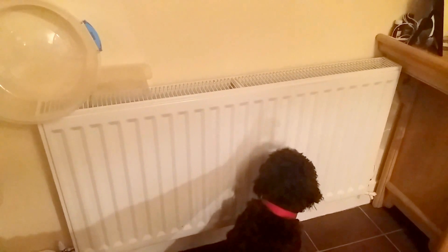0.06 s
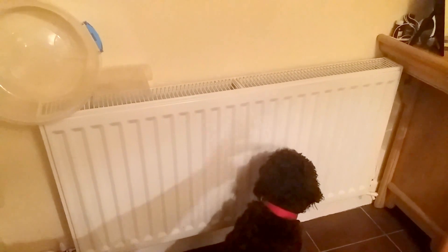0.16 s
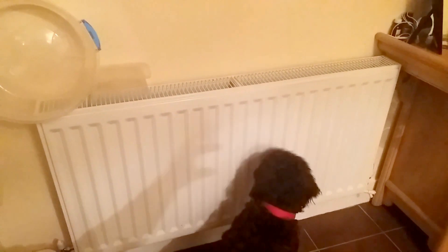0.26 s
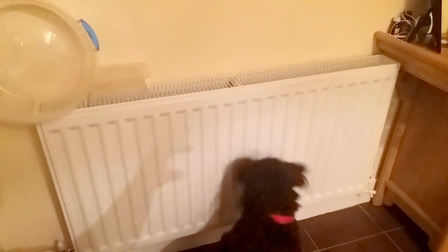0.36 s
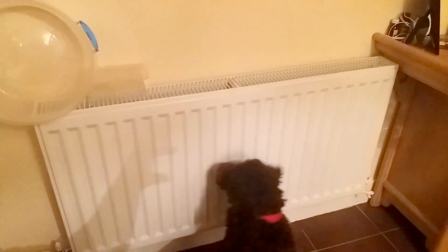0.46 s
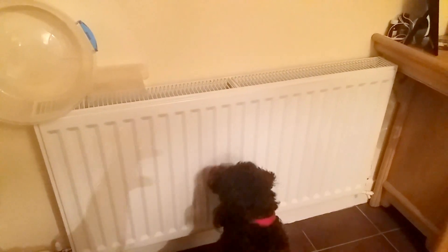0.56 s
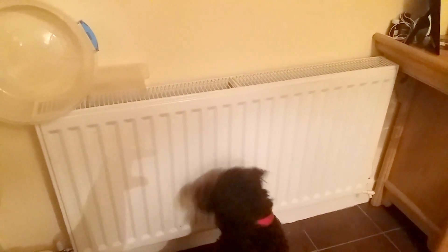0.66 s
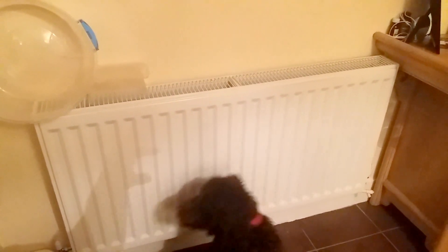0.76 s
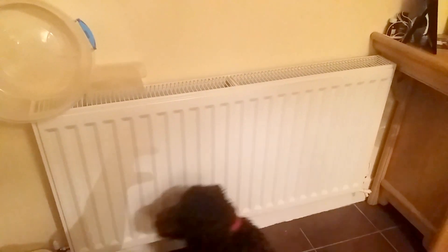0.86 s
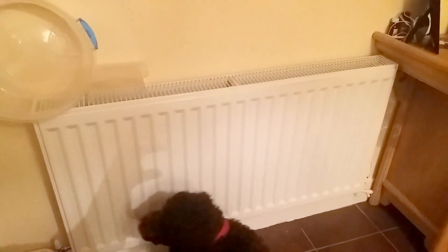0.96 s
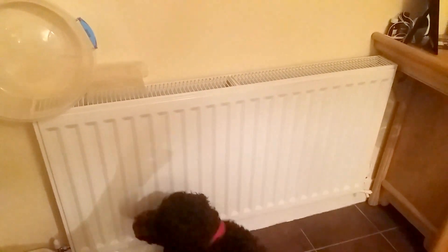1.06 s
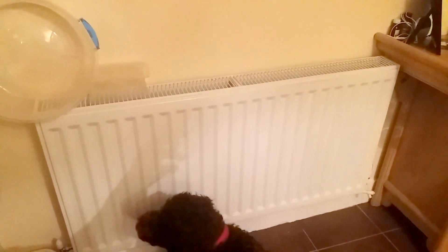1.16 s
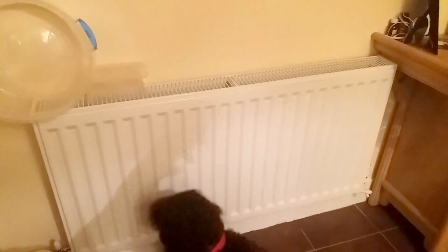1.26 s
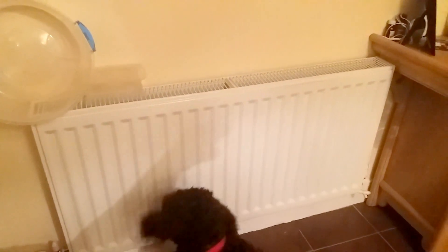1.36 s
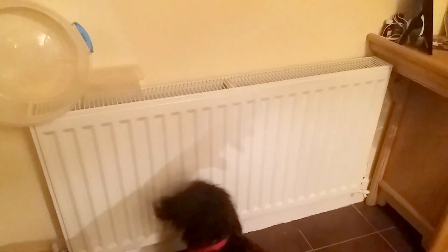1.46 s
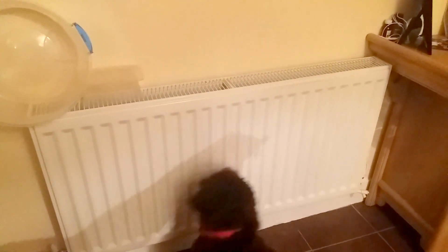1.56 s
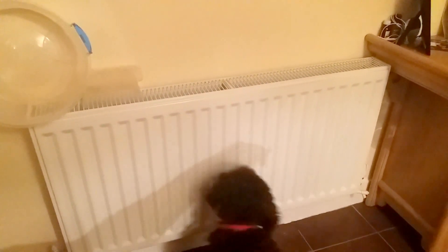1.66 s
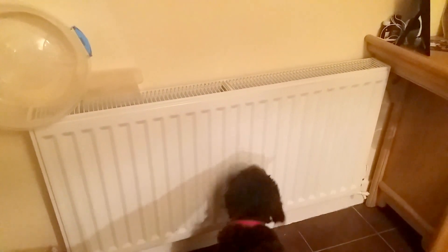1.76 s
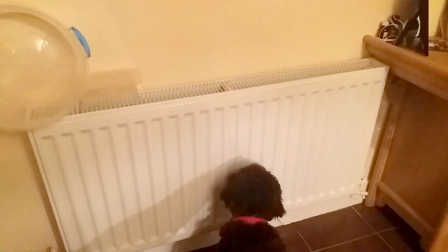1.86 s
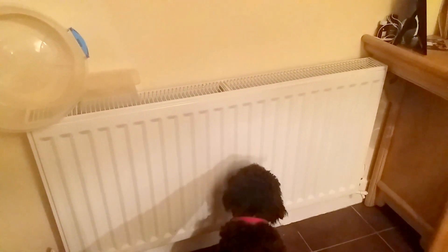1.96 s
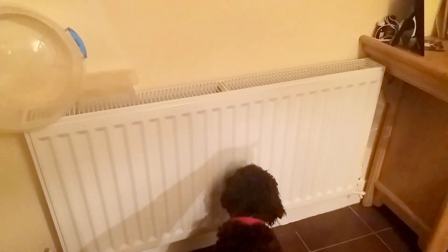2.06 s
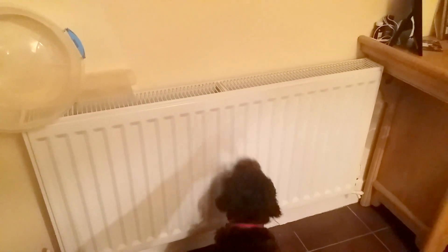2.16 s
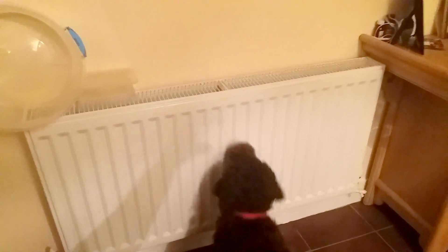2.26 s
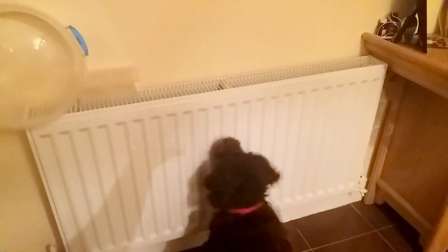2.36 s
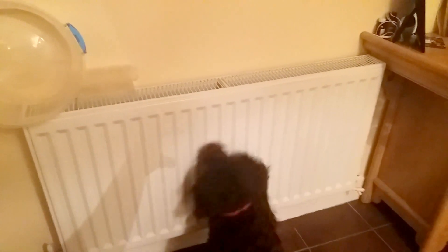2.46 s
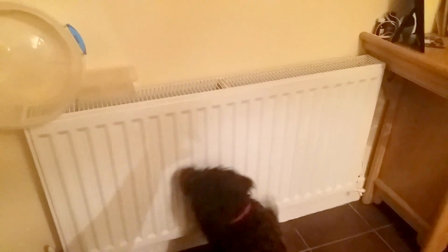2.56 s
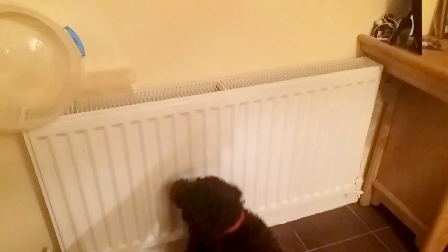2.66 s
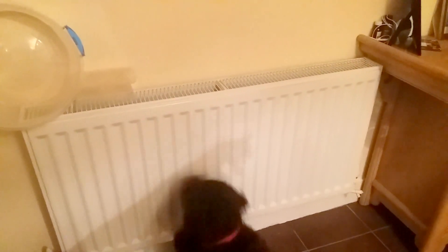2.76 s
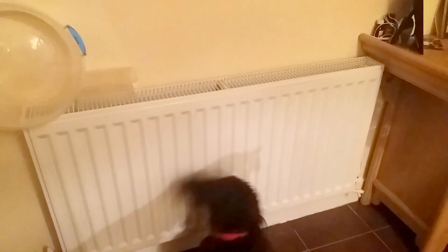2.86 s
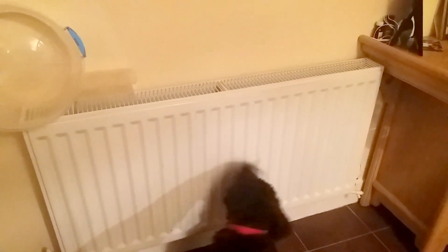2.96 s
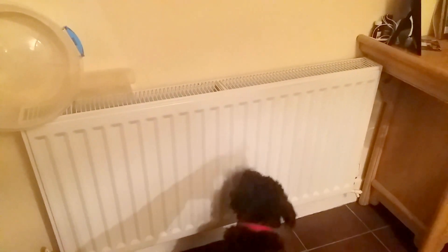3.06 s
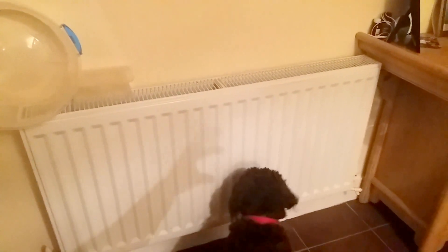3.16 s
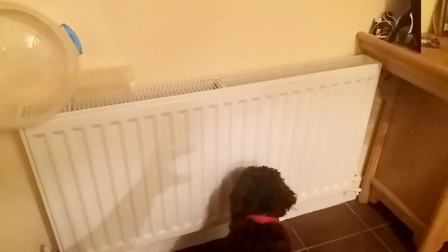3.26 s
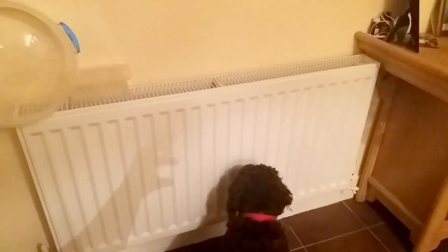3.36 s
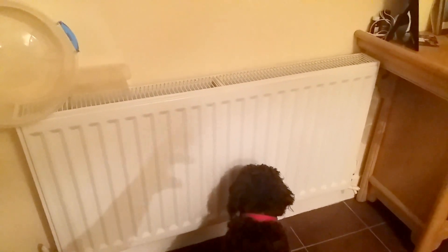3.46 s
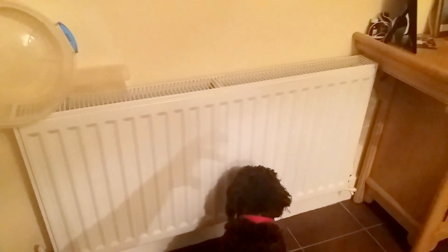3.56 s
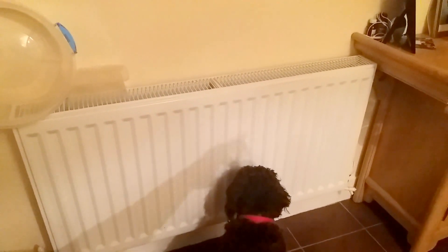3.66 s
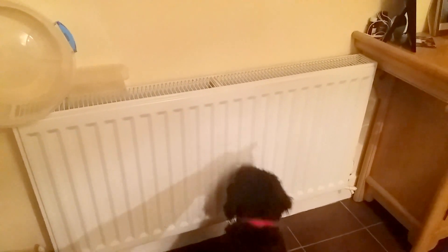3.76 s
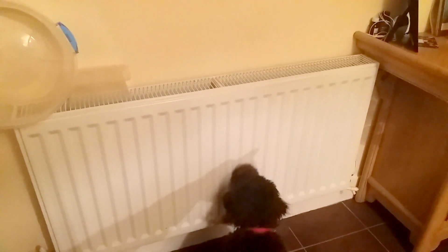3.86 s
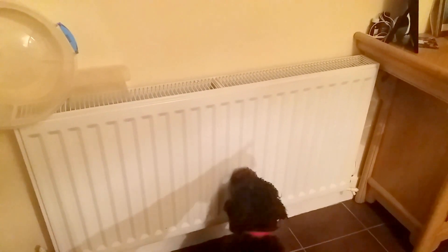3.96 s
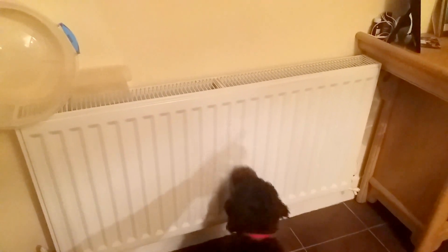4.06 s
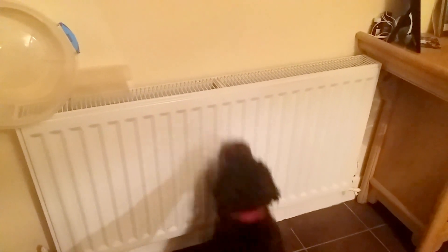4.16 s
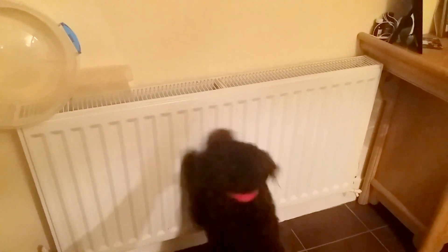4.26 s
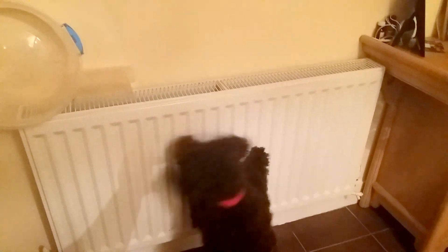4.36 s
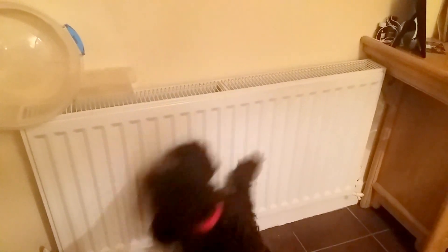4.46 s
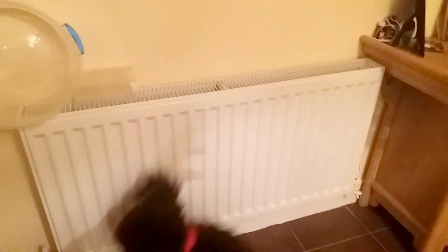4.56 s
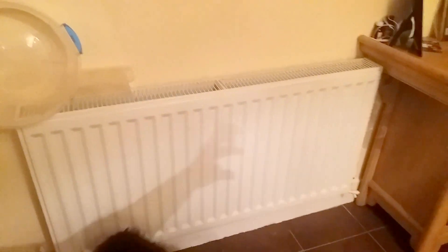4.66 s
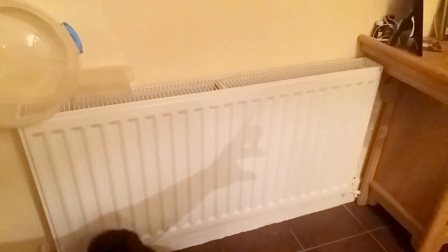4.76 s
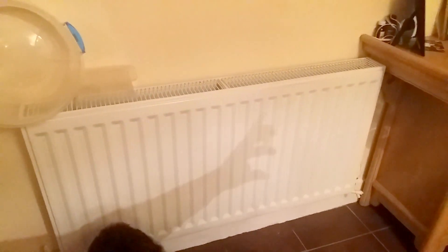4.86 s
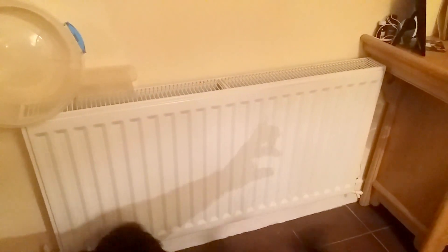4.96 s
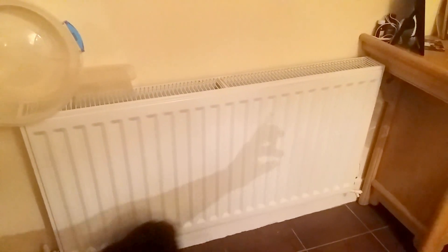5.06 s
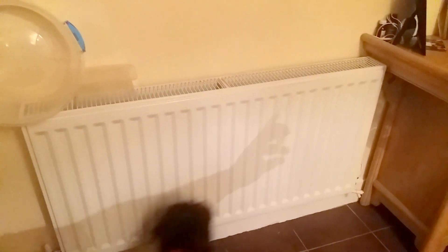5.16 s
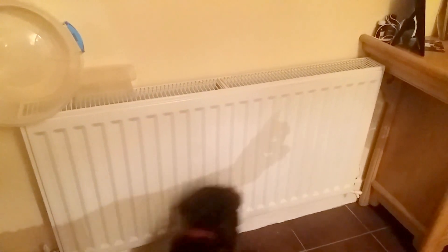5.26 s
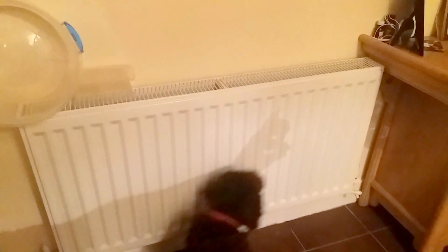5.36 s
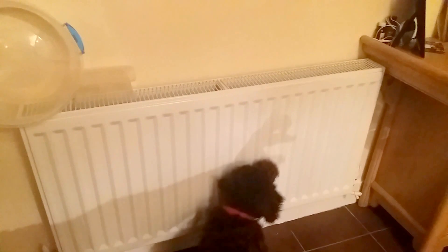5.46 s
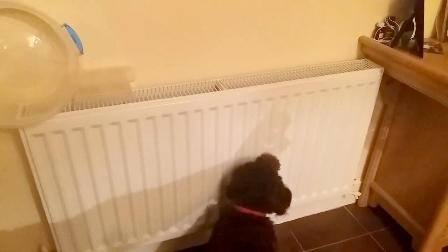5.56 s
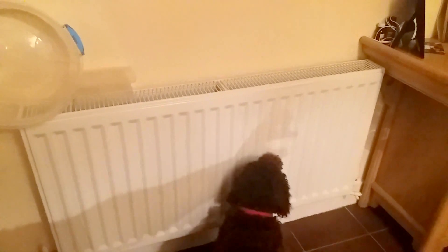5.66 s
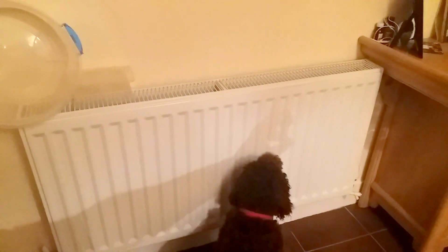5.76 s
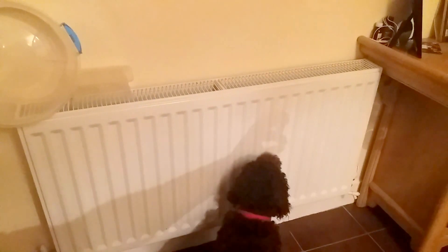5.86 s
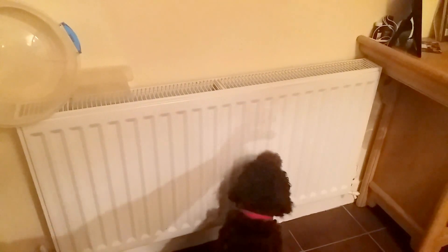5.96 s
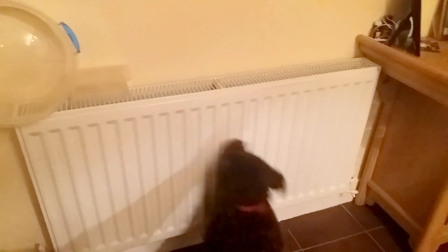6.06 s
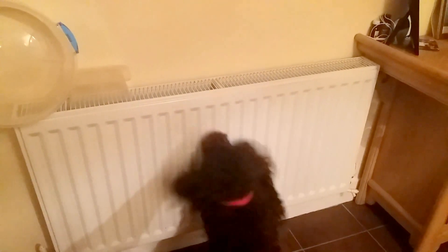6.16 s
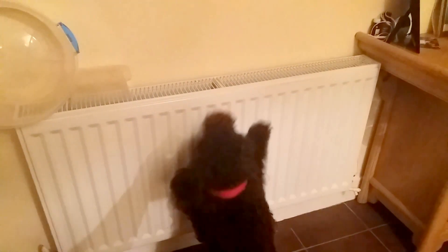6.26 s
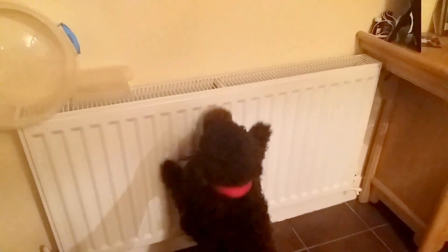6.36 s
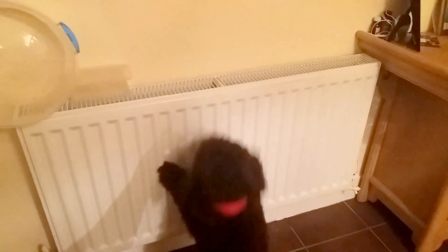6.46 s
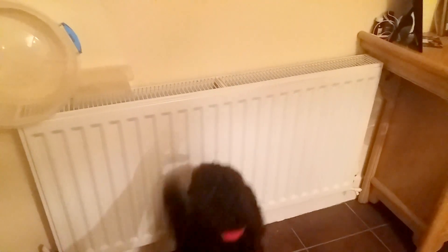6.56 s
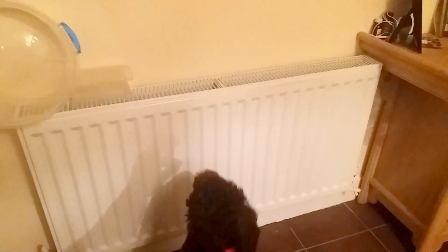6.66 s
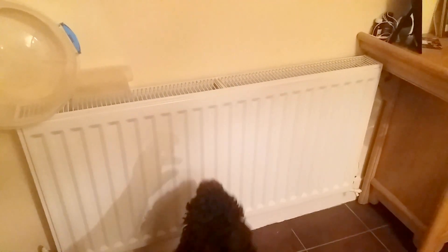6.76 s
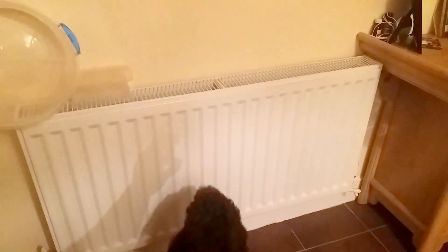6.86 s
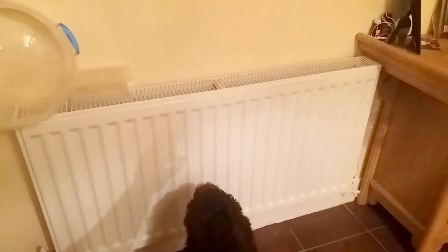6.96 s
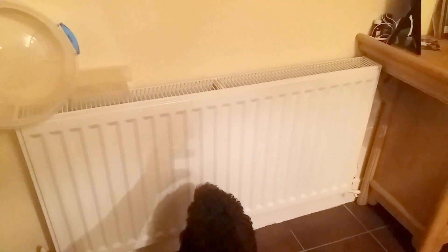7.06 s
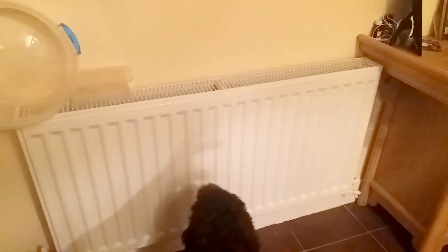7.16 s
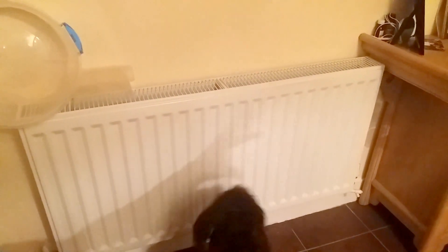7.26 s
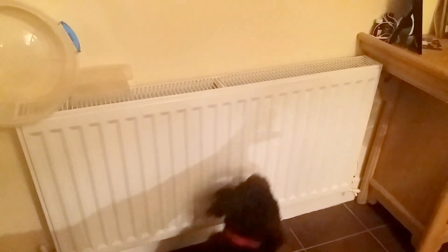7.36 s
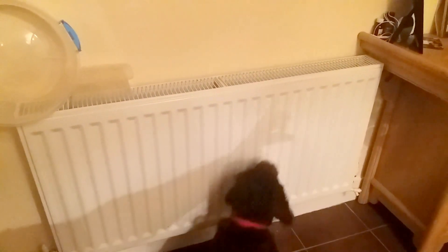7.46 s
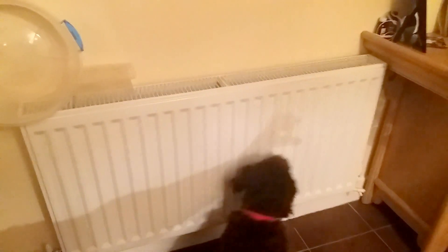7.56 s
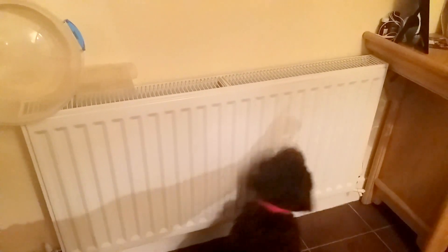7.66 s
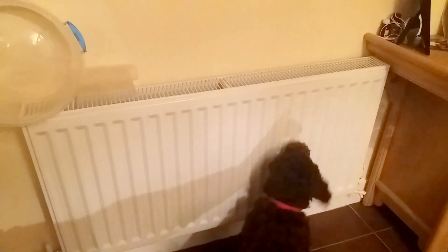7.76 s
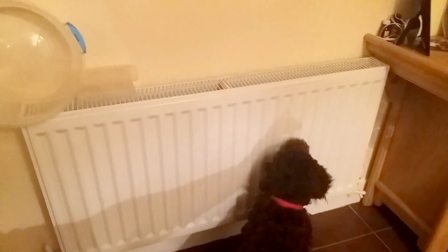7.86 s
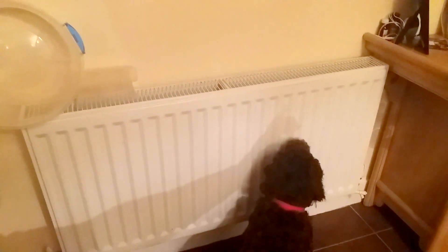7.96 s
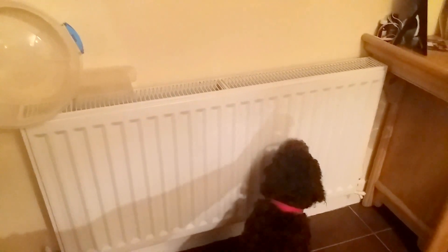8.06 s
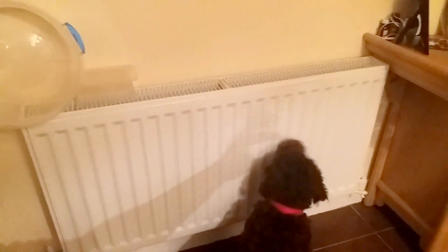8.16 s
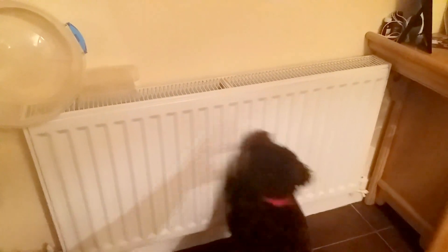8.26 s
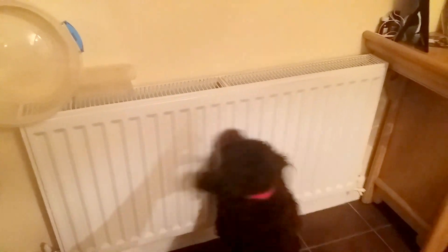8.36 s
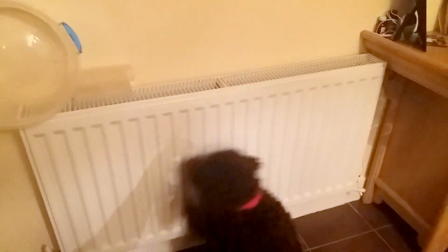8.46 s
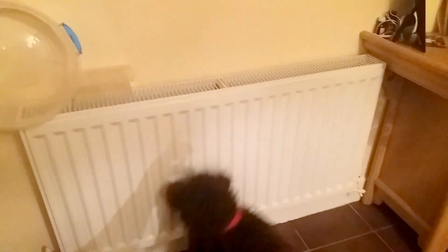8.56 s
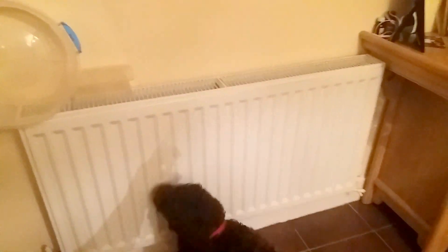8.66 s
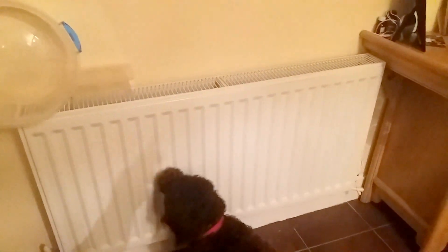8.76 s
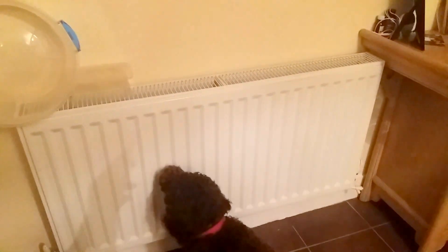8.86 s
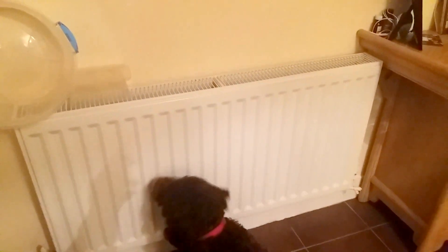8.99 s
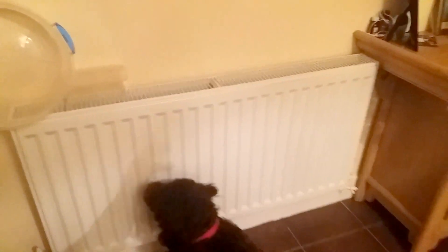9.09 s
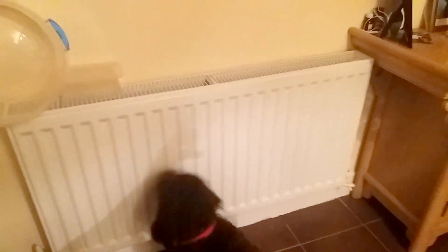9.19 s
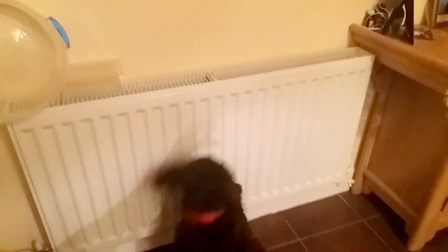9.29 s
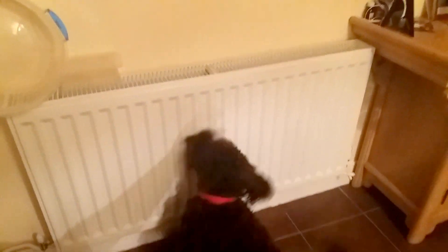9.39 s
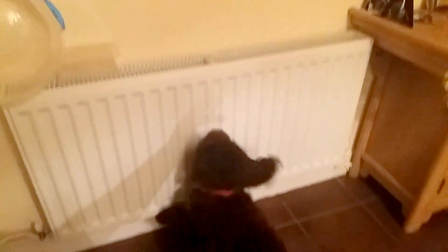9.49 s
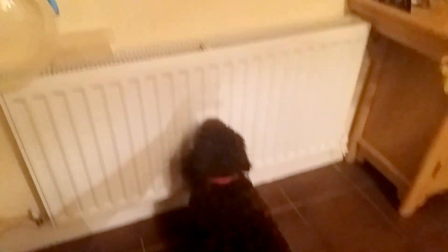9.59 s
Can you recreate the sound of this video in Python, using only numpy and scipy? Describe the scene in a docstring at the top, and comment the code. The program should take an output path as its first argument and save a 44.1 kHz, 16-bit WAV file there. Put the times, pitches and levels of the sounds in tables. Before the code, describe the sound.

Indoors, a small dog scuffles about on a tiled floor, its claws clicking and paws thumping. Four times, at roughly even gaps, a burst of scrabbling leads into one sharp, loud bark that echoes for most of a second. The first bark is the hoarsest. A few brief grunts mix with the footwork, and a couple more claw ticks come at the end. The room is otherwise nearly silent.

```python
"""A small dog barks four times in a hard, tiled room, scrabbling and jumping before each bark.
A bark is a rough train of glottal pulses through opening jaws, with chest tone, growl and breath.
There are grainy scuffs and a few short grunts; claws tick, paws thud, and the nose sniffs once.
The room rings on for most of a second over a faint tone of rumble, drone and hiss."""
import sys
import numpy as np
from scipy import signal
from scipy.fft import rfft, irfft, next_fast_len
from scipy.io import wavfile
from scipy.ndimage import uniform_filter1d, minimum_filter1d, map_coordinates

SR = 44100
rng = np.random.default_rng(int(sys.argv[2]) if len(sys.argv) > 2 else 0)


def wav_record(signal):
    """Record a signal, one row per channel, as 16-bit PCM in the file named by sys.argv[1]."""
    frames = np.transpose(np.atleast_2d(signal))
    bounded = np.clip(frames, -1, 1)
    # unit amplitude maps onto the largest positive 16-bit level
    quanta = np.round(bounded * 32767).astype(np.int16)
    wavfile.write(sys.argv[1], SR, quanta)


N = 424683


def amp(db):
    """Decibels to gain."""
    return 10 ** (np.asarray(db) / 20)


def unit(x):
    """x at rms 1."""
    return x / np.sqrt(np.mean(x ** 2) + 1e-20)


def along(points, hz):
    """Read a curve of (freq_hz, value) points on a log frequency axis."""
    f, v = np.transpose(points)
    return np.interp(np.log(hz + 1), np.log(f + 1), v)


def filtered(x, response):
    """x through a complex frequency response."""
    size = 2 * next_fast_len(len(x) // 2 + SR // 16)
    return irfft(rfft(x, size) * response(np.fft.rfftfreq(size, 1 / SR)), size)[:len(x)]


def causal(gain):
    """The minimum-phase response with this gain."""
    cepstrum = irfft(np.log(gain + 1e-6))
    cepstrum[1:len(cepstrum) // 2] *= 2
    cepstrum[len(cepstrum) // 2 + 1:] = 0
    return np.exp(rfft(cepstrum))


def eq(points):
    """Response of an EQ curve: freq_hz, gain_db."""
    return lambda hz: amp(along(points, hz))


def modes(table):
    """Response of ringing resonances: centre_hz, width_hz, gain_db."""
    return lambda f: sum((-1) ** k * amp(db) * 1j * f * width / (hz * hz - f * f + 1j * f * width)
                         for k, (hz, width, db) in enumerate(table))


def bands(table):
    """Response of steep resonances added in power: centre_hz, nominal_width_hz, gain_db."""
    return lambda f: causal(np.sqrt(sum(amp(2 * db) * np.abs(modes([(hz, 1.3 * width, 0)])(f)) ** 6
                                        for hz, width, db in table)))


def noise(response, size=N):
    """Noise coloured by a response, at rms 1."""
    return unit(filtered(rng.standard_normal(size), response))


def wobble(rate_hz, size=N):
    """A smooth random curve with rate_hz knots a second."""
    knots = rng.standard_normal(int(size * rate_hz / SR) + 4)
    return map_coordinates(knots, [np.arange(size) * rate_hz / SR])


def since(t, start_s):
    """Time after start_s, zero before it."""
    return np.maximum(t - start_s, 0)


def add(track, sound, start_s):
    """Mix a sound into the track."""
    part = track[round(start_s * SR):][:len(sound)]
    part += sound[:len(part)]


def stroke(rise_s, fall_s):
    """A rounded swell that then loses 10.5 dB every fall_s."""
    t = np.arange(-rise_s, 4 * fall_s, 1 / SR)
    return amp(np.where(t < 0, -16.5 * (t / rise_s) ** 2, -10.5 * t / fall_s))


# Reverb decay: freq_hz, t60_s
REVERB_DECAY = [(100, 0.71), (300, 0.64), (700, 0.62), (1500, 0.7), (3000, 0.66), (8000, .6), (15000, 0.15)]
# Reverb colour: freq_hz, gain_db
REVERB_EQ = [(100, -10.5), (300, -6.5), (480, -2), (3000, -1), (15000, -5)]


def room(dry, wet_db, tail_s=1):
    """Hard walls add a tail in which each frequency dies at its own speed."""
    hz, t, spectrum = signal.stft(rng.standard_normal(int(tail_s * SR)), SR, nperseg=256)
    decay = amp(-60 * t / along(REVERB_DECAY, hz)[:, None])
    tail = signal.istft(spectrum * decay, SR, nperseg=256)[1]
    tail *= 1 - np.exp(-np.arange(len(tail)) / SR / .0016)  # the walls answer after a few ms
    tail = filtered(tail / np.linalg.norm(tail), eq(REVERB_EQ))
    mix = signal.fftconvolve(dry, amp(wet_db) * tail)
    mix[:len(dry)] += dry
    return mix


# Fader ride of the room tone: time_s, level_db
BED_FADER = [(0, -70), (.7, -65.5), (1.3, -67.5), (2.3, -67), (4.3, -63.5), (5, -69.5), (5.5, -77.5),
             (6, -72.5), (7.1, -71), (8.3, -65.5), (9.1, -72.5), (9.63, -63.5)]
# Low drone: centre_hz, nominal_width_hz, gain_db
DRONE_BANDS = [(143, 60, -3), (301, 64, 0), (395, 88, 0)]
# Colour of the background hiss: freq_hz, gain_db
BED_HISS_EQ = [(53, -35.5), (90, -1.5), (151, 0), (644, -9.5), (992, -10.5), (3120, -15.5), (8620, -29.5),
               (14800, -21.5), (15800, -26)]


def room_tone():
    """Lumpy rumble, a wavering low drone and broad hiss sink and swell together."""
    level_db = np.interp(np.arange(N) / SR, *np.transpose(BED_FADER))
    rumble_eq = eq([(20, -39), (45, -18), (62, -3), (85, -10), (130, -59.5)])
    rumble = amp(-5.5 + 2.5 * wobble(3)) * noise(rumble_eq)
    drone = amp(-5.5 + 3.7 * wobble(8.8)) * noise(bands(DRONE_BANDS))
    hiss = amp(wobble(2)) * noise(eq(BED_HISS_EQ))
    return amp(level_db) * (rumble + drone + hiss)


# Low, bright and airy layers of a scuff: freq_hz, gain_db
SCUFF_BODY_EQ = [(180, -30.5), (300, -0.5), (429, -11.5), (868, -3.5), (1050, -4.5), (2200, -8),
                 (3200, -22), (8800, -120)]
SCUFF_HISS_EQ = [(1500, -39.5), (2500, -7.5), (3500, -1.5), (6500, -7), (7800, -9.5), (9000, -31),
                 (15800, -40)]
SCUFF_FIZZ_EQ = [(6000, -41), (8000, -7.5), (10000, -1), (14000, 0.5), (15800, -5)]
# Scuffs and grunts: peak_s, rise_s, fall_s, body_db, resonance_hz, hiss_db, fizz_db
SCUFF_GRUNT_CUES = [(.99, 0.12, 0.13, -62.5, 2260, -72.5, -86),
                    (1.115, 0.0041, 0.084, -80, 1000, -68, -84.5),
                    (2.441, 0.06, 0.032, -53.5, 1220, -57.5, -67.5),
                    (2.478, 0.025, 0.06, -35.5, 1496, -52, -62),
                    (2.54, .003, 0.036, -44.5, 1000, -40.5, -54.5),
                    (2.632, 0.0061, .06, -51.5, 1000, -45, -43.5),
                    (3.88, 0.0087, 0.051, -47, 1498, -60.5, -78),
                    (3.923, 0.0018, 0.059, -59, 1490, -53, -59),
                    (4.292, 0.0027, 0.2, -44.5, 1130, -61, -83.5),
                    (4.348, 0.0037, 0.04, -37.5, 900, -44, -65),
                    (4.375, 0.006, 0.057, -32.5, 900, -35.5, -42),
                    (6.112, 0.0037, .08, -57, 1000, -77, -92), (6.175, 0.047, 0.029, -51, 1000, -57, -67.5),
                    (6.19, 0.0045, 0.044, -40, 980, -50, -69.5),
                    (6.214, 0.0019, 0.076, -37, 2530, -47, -51.5),
                    (6.472, 0.0036, 0.076, -47, 1000, -43.5, -49),
                    (7.351, .05, 0.08, -63, 1950, -66, -79.5), (7.42, 0.0042, .04, -64, 800, -80.5, -90),
                    (7.507, .003, .02, -85, 1000, -67.5, -79.5),
                    (7.564, 0.052, 0.06, -85.5, 1002, -64, -76),
                    (7.852, .032, 0.064, -57.5, 1002, -75, -88),
                    (8.295, 0.037, 0.016, -53.5, 900, -67, -82.5),
                    (8.31, .008, 0.22, -39, 795, -58.5, -79.5),
                    (8.332, 0.0025, 0.079, -41, 2230, -45.5, -51.5),
                    (8.476, .03, 0.035, -38.5, 1005, -41, -57),
                    (9.535, 0.00296, 0.16, -45, 850, -65, -65.5)]


def scuffs_and_grunts():
    """Grainy scuffs on the tiles and a few short grunts, each with one pitched resonance."""
    track = np.zeros(N)
    hiss, fizz = noise(eq(SCUFF_HISS_EQ)), noise(eq(SCUFF_FIZZ_EQ))
    for peak_s, rise_s, fall_s, body_db, resonance_hz, hiss_db, fizz_db in SCUFF_GRUNT_CUES:
        start = round((peak_s - rise_s) * SR)
        swell = stroke(rise_s, fall_s)[:N - start]
        span = slice(start, start + len(swell))
        resonance = modes([(resonance_hz, .45 * resonance_hz, 0)])
        body = noise(lambda hz: eq(SCUFF_BODY_EQ)(hz) * (1 + amp(3.5) * resonance(hz) ** 2), len(swell))
        treble = amp(hiss_db) * hiss[span] + amp(fizz_db) * fizz[span]
        track[span] += swell * amp(body_db) * body + swell ** 1.3 * treble  # treble swells more steeply
    grain = unit(amp(2.2 * wobble(300) + 2 * wobble(40)))
    return track * grain


# Knock of the tiles: centre_hz, width_hz, gain_db
TILE_MODES = [(860, 250, 3.5), (3200, 600, 0)]
# Claw hits and their bass and treble tilt: start_s, peak_db, knock_db, top_db
CLAW_CUES = [(2.194, -46.5, 1, -23), (3.5627, -51, -16, -8.5), (3.873, -39, 2.5, -32),
             (4.2893, -40, 2.5, -32.5), (4.3442, -23, -8.5, -27), (4.369, -17, -7.5, -17),
             (4.517, -27, -15.5, -16.5), (5.0738, -42, -8, -13.5), (5.545, -49, 4.5, -17.5),
             (6.109, -45.5, 8.5, -22), (6.1894, -26, -8.5, -33), (6.2121, -28, -12, -11.5),
             (6.6894, -32.5, -4, -18.5), (7.8412, -41.5, -6, -31), (8.312, -26.5, 0, -25.5),
             (8.328, -25, -14.5, -12.5), (9.3163, -21, 0.5, -26.5), (9.5356, -26, 2, -28.5)]


def claws():
    """A hard claw strikes tile: one sharp contact, a bright tick over a duller knock."""
    track = np.zeros(N)
    contact = signal.unit_impulse(SR // 40)
    for start_s, peak_db, knock_db, top_db in CLAW_CUES:
        colour = eq([(150, knock_db - 17.5), (500, knock_db + 6), (1200, knock_db + 5),
                     (2200, knock_db / 2), (3600, .5),
                     (6500, top_db / 2 + 2), (11000, top_db - .5), (16000, top_db + 4)])
        tick = filtered(contact, lambda hz: causal(colour(hz) * (1 + np.abs(modes(TILE_MODES)(hz)))))
        add(track, amp(peak_db) * tick / np.abs(tick).max(), start_s)
    return track


# Paw thuds and hollow knocks: start_s, level_db, pitch_hz
THUD_CUES = [(2.474, -37, 270), (2.63, -45, 62), (3.898, -46.5, 600), (4.183, -58, 1048),
             (4.337, -42.5, 147), (4.383, -33, 237), (4.39, -37, 62.5), (6.172, -35.5, 231.5),
             (6.21, -42, 234), (6.248, -37, 208), (6.298, -38, 143), (6.32, -33, 62.6), (6.44, -27.5, 125),
             (6.86, -51, 65), (7.84, -53, 306.4), (8.3, -44.5, 226), (8.404, -34, 266),
             (8.451, -41.5, 61.7), (9.605, -37, 137)]


def paw_thuds(attack_s=.0015, t60_s=.22):
    """Pads land on the floor: a damped tone with a band of noise around it."""
    track, t = np.zeros(N), np.arange(SR // 5) / SR
    envelope = (1 - np.exp(-t / attack_s)) * amp(-60 * t / t60_s)
    for start_s, level_db, pitch_hz in THUD_CUES:
        tone = np.sin(2 * np.pi * pitch_hz * t)
        bump = noise(bands([(pitch_hz, .79 * pitch_hz, 0)]), len(t))
        add(track, amp(level_db) * envelope * (tone + .9 * bump), start_s)
    return track


def vocal_folds(t, pitch_hz, roughness, alternation, chest_s):
    """Jittery glottal pulses and pulsed noise; weakening every second pulse adds the octave below."""
    roughness = np.clip(roughness * np.interp(t, [0, .06], [1.25, 1]), 0, 1)  # hoarser at the start
    alternation = np.interp(t, [chest_s, chest_s + .015], [.6, alternation])  # shifts at the chest break
    jitter = .12 * roughness * wobble(200, len(t)) + .04 * wobble(35, len(t))
    cycles = np.cumsum(pitch_hz * (1 + jitter)) / SR
    count = np.floor(cycles).astype(int)
    shimmer = amp(3.5 * roughness * rng.standard_normal(len(t))[count])
    airflow = np.exp(-6 * (cycles % 1)) * (1 + alternation * (-1.) ** count) * shimmer
    pulses = unit(np.diff(airflow, prepend=0).clip(0))
    rasp = unit(airflow * rng.standard_normal(len(t)))
    return np.sqrt(1 - roughness) * pulses + np.sqrt(roughness) * rasp


def mouth(source, formants, t, murmur_s, opening_s, shut_hz, shut_db, flare_s=.069):
    """As the jaws open, the formants come out and glide into place; the top one flares late."""
    low, first, second, upper, top = np.array(formants)
    upper_shut = np.array([shut_hz, 220, shut_db])
    jaw = 1 - np.exp(-(t / opening_s) ** 2)
    lagging_jaw = 1 - np.exp(-(t / opening_s / 1.7) ** 2)
    stages, vowel, edge = np.linspace(0, 1, 5), 0, 0
    for stage in stages:  # crossfade through mouth shapes, shut to open
        shut = 1 - stage
        # offsets with the jaws shut: centre_hz, nominal_width_hz, gain_db
        shape = [low + shut * np.array([110, -.62 * low[1], 0]),
                 first + shut * np.array([0, 600, -7]),
                 second + shut * np.array([305, 0, -7])]
        vowel += np.interp(jaw, stages, stages == stage) * unit(filtered(source, bands(shape)))
        gliding = shut * upper_shut + stage * upper
        edge += np.interp(lagging_jaw, stages, stages == stage) * filtered(source, bands([gliding]))
    edge *= np.clip((t - murmur_s) / .002, 0, 1) * amp(-90 * since(t, flare_s))
    flare = filtered(source, bands([top])) / (1 + np.exp((flare_s - t) / .008))
    vowel_rms = np.std(filtered(source, bands([low, first])))
    return vowel + (edge + flare) / vowel_rms


def chest_tone(t, pitch_hz, chest_s, chest_hz):
    """A wavering tone midway between chest_hz and half the voice's pitch swells, then breaks off."""
    swell_db = np.interp(t, [0, .0082], [-8, 0])
    break_db = -20 * (1 - np.exp(-since(t, chest_s) / .011))
    tone_hz = (chest_hz + pitch_hz / 2) / 2 * (1 + .055 * wobble(80, len(t)))
    tone = np.sin(2 * np.pi * np.cumsum(tone_hz) / SR)
    return amp(swell_db + break_db + 2.5 * wobble(71, len(t))) * tone


# Colour of the breath: freq_hz, gain_db
BREATH_EQ = [(3000, -27.5), (4500, -4.5), (6000, -0.5), (7800, -6), (9000, -14.5), (15800, -22.5)]


def breath(t, breath_db, puff_s, puff_db, rise_s=.0077, fall_s=.019):
    """Air hisses through the bark, fluttering, with one short puff."""
    puff = amp(puff_db) * np.exp(np.minimum((t - puff_s) / rise_s, (puff_s - t) / fall_s))
    return (amp(breath_db) + puff) * amp(3.2 * wobble(130, len(t))) * noise(eq(BREATH_EQ), len(t))


def bark(cue, formants, chest_hz=263.6, climb_s=.065, sag_hz_per_s=480, sag_db_per_s=94):
    """A brief murmur breaks into a voice that climbs and sags, over chest tone, growl and breath."""
    (murmur_s, attack_s, length_s, level_db, first_hz, top_hz, chest_db, chest_s, opening_s,
     breath_db, puff_s, puff_db, roughness, alternation, growl_db, shut_hz, shut_db) = cue
    t = np.arange(0, length_s + .06, 1 / SR)
    murmur_db = -12 * np.clip((murmur_s - t) / .003, 0, 1)
    attack_db = -18.5 * np.clip(1 - t / attack_s, 0, 1) ** 2
    envelope = amp(level_db + murmur_db + attack_db - sag_db_per_s * since(t, attack_s))
    climb = np.clip(t / climb_s, 0, 1) ** 1.6
    pitch_hz = first_hz + (top_hz - first_hz) * climb - sag_hz_per_s * since(t, climb_s)
    source = vocal_folds(t, pitch_hz, roughness, alternation, chest_s)
    voice = mouth(source, formants, t, murmur_s, opening_s, shut_hz, shut_db)
    growl = amp(growl_db) * noise(bands([(chest_hz / 2, 60, 0)]), len(t))
    chest = amp(chest_db + murmur_db / 2) * chest_tone(t, pitch_hz, chest_s, chest_hz)
    fades = np.clip(t / .0027, 0, 1) * np.exp(-since(t, length_s) / .0045)
    return fades * (envelope * (voice + growl) + chest + breath(t, breath_db, puff_s, puff_db))


# Barks: start_s, murmur_s, attack_s, length_s, level_db, first_hz, top_hz, chest_db, chest_s,
# opening_s, breath_db, puff_s, puff_db, roughness (0-1), alternation (0-1),
# growl_db (against the voice), shut_hz, shut_db (the upper formant with the jaws shut)
BARK_CUES = [ (2.539, 0.0079, 0.053, 0.14, -15, 520, 579.6, -22.5, 0.09, 0.042, -54, .09, -48, .65, 1, -19.5, 3455, -15.5),
             (4.456, .012, 0.034, .175, -10, 520, 640.2, -25, 0.038, 0.038, -63, 0.087, -53.5, .5, 0.25, -31.5, 2996, -28.5),
             (6.328, 0.015, 0.048, .172, -13, 465.2, 546.2, -21.5, 0.047, 0.023, -65.5, 0.098, -49.5, .4, 0.3, -36, 3720, -1),
             (8.482, 0.014, 0.058, 0.17, -11.5, 522.6, 594.4, -20, 0.037, 0.032, -61.5, 0.085, -48, .36, 0.28, -36.5, 3100, -16),
             ]
# Five open-mouth formants for each bark: centre_hz, nominal_width_hz, gain_db
BARK_FORMANTS = [
    [(682, 640, 2.5), (980, 110, -1), (1820, 260, -17.5), (4400, 300, -13), (3480, 350, -23)],
    [(650, 430, -1), (1014, 230, -8), (2020, 350, -21.5), (3287, 360, -21.5), (5300, 1500, -41.5)],
    [(610, 420, 4), (970, 560, -3.5), (1647, 400, -14.5), (3250, 330, -20.5), (4800, 1100, -31.5)],
    [(647, 620, -1.5), (1307, 267, -5), (1960, 175, -14), (3316, 310, -18.5), (5270, 530, -35)],
]


def dog():
    """Each bark has its own mouth shape and sets the room ringing."""
    track = np.zeros(N)
    for (start_s, *cue), formants in zip(BARK_CUES, BARK_FORMANTS):
        add(track, room(bark(cue, formants), wet_db=4), start_s)
    return track


# Sniff: peak_s, level_db
SNIFF_CUES = [(8.189, -70.5)]


def sniff(rise_s=.05, fall_s=.1):
    """Air drawn through the nose swells in a narrow, high band."""
    track, swell = np.zeros(N), stroke(rise_s, fall_s)
    for peak_s, level_db in SNIFF_CUES:
        air = noise(lambda hz: modes([(6400, 1300, 0)])(hz) ** 2, len(swell))
        add(track, amp(level_db) * swell * air, peak_s - rise_s)
    return track


def scene():
    """The dog and its footwork over the room tone, in mono; claws and barks are the wettest."""
    rustle = room(scuffs_and_grunts() + sniff(), wet_db=-5.5, tail_s=.5)[:N]
    ticks = room(claws(), wet_db=5)[:N]
    thuds = room(paw_thuds(), wet_db=0)[:N]
    return (room_tone() + rustle + ticks + thuds + dog())[None]


def record(dry, low_cut_hz=36, ceiling=.94, top_hz=15830):
    """The microphone drops the deepest bass, a fast limiter holds the peaks, the very top is cut."""
    x = filtered(dry[0], lambda hz: (1j * hz / (low_cut_hz + 1j * hz)) ** 2)
    needed_gain = np.minimum(1, ceiling / (np.abs(x) + 1e-9))
    held_gain = minimum_filter1d(needed_gain, size=SR // 100)
    smooth_gain = uniform_filter1d(held_gain, size=SR // 200)
    return filtered(x * smooth_gain, lambda hz: hz < top_hz)[None]


dry = scene()
out = record(dry)
wav_record(out)
```